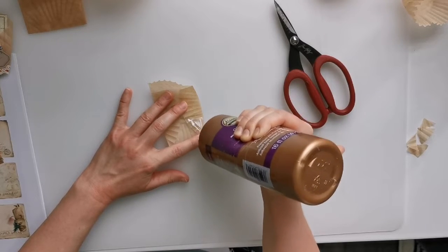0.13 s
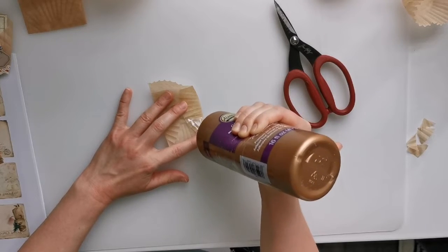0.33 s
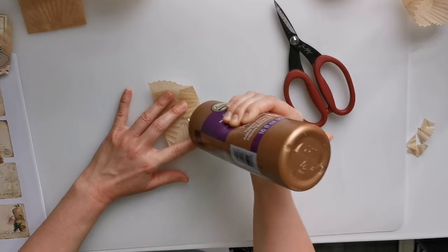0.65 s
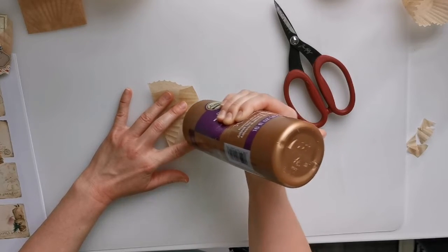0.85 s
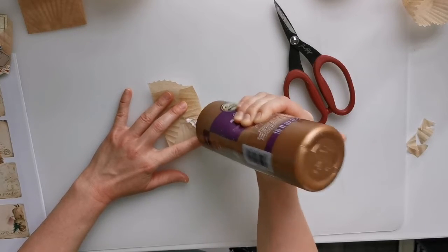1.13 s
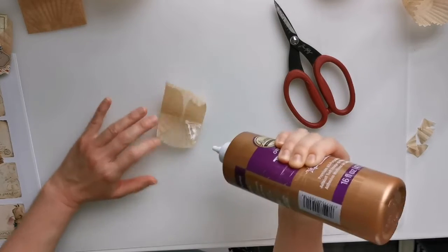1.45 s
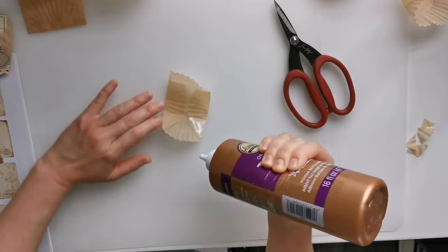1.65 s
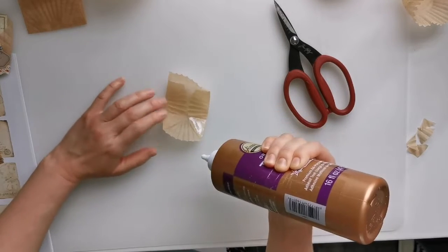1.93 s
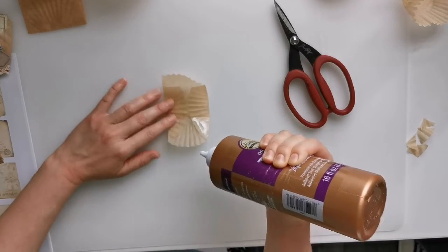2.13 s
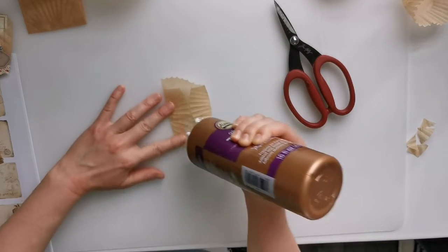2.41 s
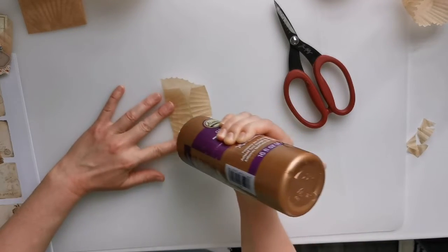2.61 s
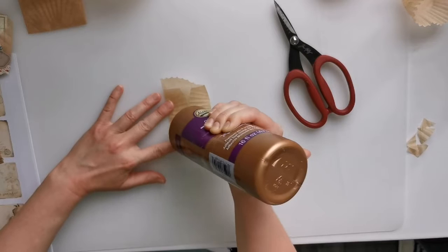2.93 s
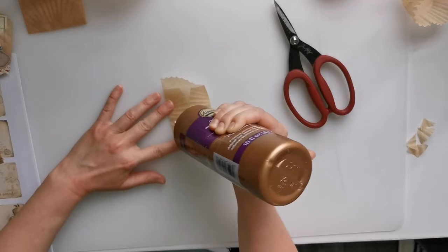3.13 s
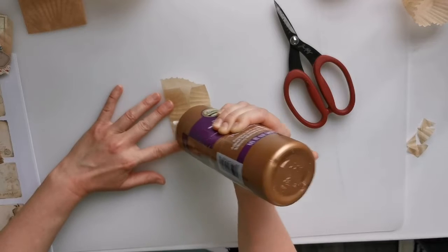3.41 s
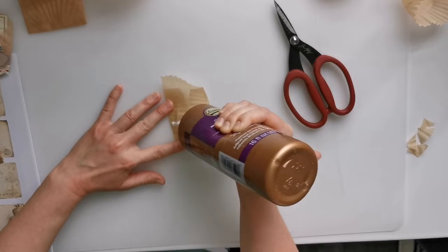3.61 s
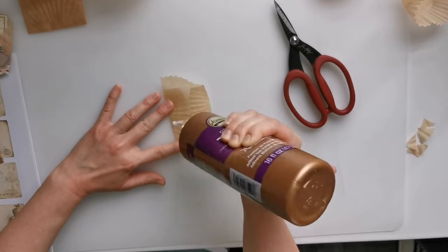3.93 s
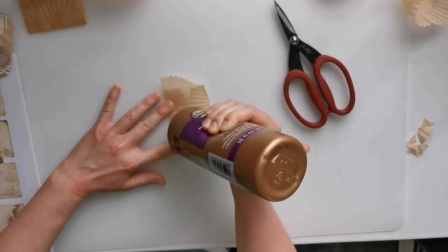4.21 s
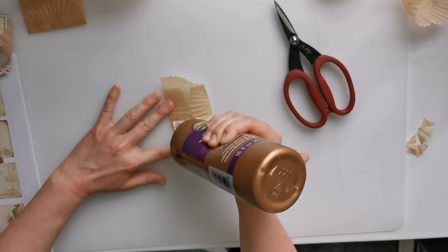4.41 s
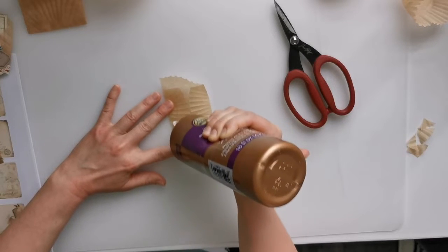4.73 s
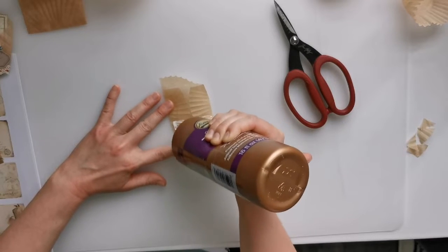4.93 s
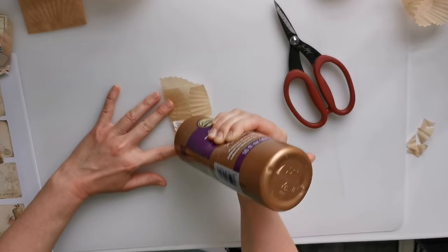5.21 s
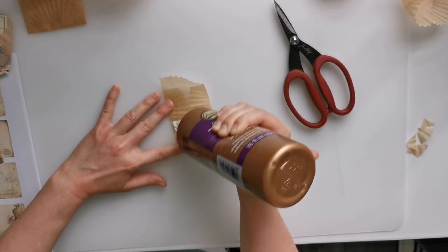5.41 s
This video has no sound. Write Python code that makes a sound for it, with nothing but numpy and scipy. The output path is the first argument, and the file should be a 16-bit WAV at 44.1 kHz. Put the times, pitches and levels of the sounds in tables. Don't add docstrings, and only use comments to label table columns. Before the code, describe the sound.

Thin crisp paper buckles in tiny bright snaps, some with a brief papery thump or crunch. Bursts are irregular with near-silent gaps; the strongest run comes just past the middle, and a lighter one closes. Faint hollow plastic ticks from the bottle are barely noticeable. Close stereo pickup indoors, with table and wall reflections, distant appliance rumble and soft microphone hiss.

```python
import sys
import numpy as np
from scipy import signal
from scipy.fft import irfft
from scipy.io import wavfile
from scipy.ndimage import uniform_filter1d

SR = 44100
rng = np.random.default_rng(int(sys.argv[2]) if len(sys.argv) > 2 else 0)


def bounce(signal):
    frames = np.transpose(np.atleast_2d(signal))
    limited = np.clip(frames, -1, 1)
    pcm = np.round(limited * 32767).astype(np.int16)
    wavfile.write(sys.argv[1], SR, pcm)


def makeup_ratio(level_db):
    decades = np.asarray(level_db, float) / 20
    return 10 ** decades


N = 245195

# pitch_hz, level_db, t60_s
SHEET_MODES = [(3050, -10, .0018), (4750, -3, .0022), (5800, -4, .0016), (7050, 0, .0022),
               (8800, -2, .0018), (10600, -4, .0015), (12200, -5, .0015), (13900, -8, .0014),
               (15500, -10, .0014)]
# pitch_hz, level_db, t60_s
CUP_MODES = [(890, 3, 0.0041), (1310, 0.5, 0.0044), (2290, 14, 0.0015)]


def evened(x):
    return x / np.sqrt(np.mean(x ** 2) + 1e-20)


def read(points, hz):
    f, value = np.transpose(points)
    return np.interp(np.log(hz + 1), np.log(f + 1), value)


def add(mix, start_s, sound):
    part = mix[:, max(round(start_s * SR), 0):][:, :sound.shape[1]]
    part += sound[:, :part.shape[1]]


def ring(modes, bright_db, luck, spread_db, detune=.045, rise_s=.0002):
    hz, db, t60 = np.transpose(modes)[:, :, None]
    k = len(modes)
    t = np.arange(400) / SR
    hz = hz * (1 + detune * luck[:k, None])
    db = db + bright_db * np.log2(hz / 7000) * 0.33
    own = luck[k:3 * k].reshape(2, k, 1)
    shared = luck[3 * k:4 * k, None]
    level = makeup_ratio(db + spread_db * (shared + .9 * own) - 60 * t / t60)
    phase = np.pi * np.arange(k)[:, None] + 0.67 * own * np.sqrt(hz / 7000) + 0.5 * shared
    onset = 1 - np.exp(-(t / rise_s) ** 2)
    sound = (level * np.sin(2 * np.pi * hz * t + phase)).sum(1) * onset
    return sound / abs(sound).max(1, keepdims=True)


def shatter(sound, luck, share=0.035, db=-10.0, t60_s=0.022):
    t = np.arange(len(luck)) / SR
    slips = np.sign(luck) * (abs(luck) < share) * makeup_ratio(db - 60 * t / t60_s) * (t > .0004)
    return signal.fftconvolve(sound, slips[None], axes=1)


def snaps():
    # start_s, peak_db, brightness_db, pitch_hz, second_pitch_hz
    dabbing = [(0.0168, -35, 1, 9300, 13600), (0.1481, -45, 10, 9170, 11600), (0.182, -48, 10, 9260, 5300),
               (0.2045, -40, 11, 6850, 10900), (0.2147, -34.5, 21, 13100, 9600),
               (0.2175, -44, 20, 13600, 12000), (0.3185, -60, -3, 2710, 5040),
               (0.6972, -56, -2, 4550, 7320), (0.7004, -58, 15, 12190, 9860),
               (0.8081, -40.5, 7, 6700, 9500), (0.8176, -44, 13, 9800, 6900), (0.8854, -29, 7, 6500, 8200),
               (0.9151, -30, 20, 7230, 9600), (1.0425, -38.5, 10, 6600, 9050),
               (1.1129, -44, 22, 9550, 6700), (1.1319, -57, 3, 12200, 4610)]
    # start_s, peak_db, brightness_db, pitch_hz, second_pitch_hz
    lifting = [(1.356, -34, -3, 12500, 9040), (1.3861, -32.5, 1, 5130, 12490),
               (1.3882, -34, 9, 12620, 8740), (1.3914, -28.5, 10, 12900, 10100),
               (1.4175, -46, 1, 7580, 4690), (1.42, -28.5, -4, 4740, 6720),
               (1.4252, -19.5, -0.5, 6760, 12300), (1.4266, -24, 10, 7110, 9800),
               (1.484, -46, -9, 3190, 5120), (1.7122, -53, -7, 4910, 6890), (1.7144, -60, -16, 4950, 6850),
               (1.7237, -53, 5, 9090, 2630), (1.726, -60, 9, 9090, 7600), (1.768, -60, 4, 9560, 5300),
               (1.7801, -50, -14.5, 5550, 7580), (1.7826, -48, 0.5, 6680, 5130),
               (2.2116, -40, 2, 8910, 6930), (2.2256, -30.5, 13, 5870, 9470), (2.252, -40, -14, 4610, 3100),
               (2.2643, -33.5, -32, 4900, 7000), (2.3187, -37, -2, 7000, 3360),
               (2.3219, -30.5, 3, 4850, 7700), (2.3498, -36.5, -20, 6860, 3550),
               (2.3643, -48, 2, 4570, 7670), (2.3666, -43.5, -11, 4330, 7500), (2.3694, -44, 3, 5900, 9500),
               (2.4514, -55, 1, 6550, 4950), (2.5012, -49, 3, 5600, 7900)]
    # start_s, peak_db, brightness_db, pitch_hz, second_pitch_hz
    pressing = [(3.056, -53, -6, 5120, 7500), (3.0666, -35, -2.5, 5930, 10000),
                (3.1382, -36.5, -11, 5800, 9400), (3.1872, -26, -8, 6800, 5120),
                (3.2469, -22.5, 7, 6700, 8570), (3.279, -32, 15, 7100, 9100),
                (3.3064, -30, -14, 6760, 5400), (3.3233, -30, -15, 6930, 5160),
                (3.36, -32.5, 5, 5240, 9000), (3.3903, -41, 1, 7200, 4850), (3.417, -35.5, 4, 7250, 10470),
                (3.4189, -29, 12, 7140, 5530), (3.4552, -40.5, -24, 2650, 7320),
                (3.5374, -23, 29, 9450, 7740), (3.5812, -27, 12, 7070, 4930), (3.6054, -40, -4, 5510, 9170),
                (3.6087, -19.5, 11, 6830, 8470), (3.6228, -41, 0, 7240, 5040),
                (3.6651, -29, -9, 9200, 6500), (3.672, -35, 8, 7000, 5340), (3.6759, -27.5, -6, 4700, 7150)]
    # start_s, peak_db, brightness_db, pitch_hz, second_pitch_hz
    dragging = [(3.7202, -30.5, 15, 11020, 6630), (3.7233, -24, -3, 6980, 11000),
                (3.7587, -26, -4, 9600, 13200), (3.7754, -24, -30, 5030, 6600),
                (3.8083, -36, -27, 4800, 7200), (3.8243, -20.5, -9, 4430, 11700),
                (3.8262, -19, -12, 7100, 2900), (3.8417, -27.5, -17, 6330, 10800),
                (3.8549, -16.5, -1, 7430, 8750), (3.9036, -29, -4, 7040, 5100),
                (3.929, -41, 2, 4520, 10470), (3.932, -31, 3, 4260, 8900), (3.968, -33, 5, 6170, 12200),
                (3.9799, -20, -6, 11000, 6300), (4.0267, -21.5, 3, 5360, 7900),
                (4.0545, -35, 22, 10900, 4540), (4.1703, -35.5, 11, 6120, 7500)]
    # start_s, peak_db, brightness_db, pitch_hz, second_pitch_hz
    finishing = [(4.4078, -64, -19, 5200, 3360), (4.5055, -57, -7, 6800, 5210),
                 (4.569, -45.5, -25, 5600, 9660), (4.592, -56, 0, 5470, 9860),
                 (4.6252, -52.5, 20, 11500, 7800), (4.6785, -23, 16, 5270, 9500),
                 (4.716, -34, 11, 5100, 10000), (4.7184, -37.5, 10, 8650, 4870),
                 (4.925, -59, -9, 2900, 6030), (4.9742, -48.5, -1, 6540, 9730),
                 (4.9775, -48, 8, 10510, 6050), (4.9814, -50.5, 13, 12500, 9200),
                 (5.09, -44, 8, 11330, 7920), (5.0923, -45.5, 2, 7280, 11330), (5.115, -55, 4, 6030, 12620),
                 (5.1177, -38, -6, 6600, 8700), (5.1231, -31.5, 8, 8500, 12600),
                 (5.13, -38, 12, 9170, 6850), (5.1345, -32, 8, 8600, 6590), (5.1372, -35, 14, 8530, 6850),
                 (5.1536, -25, 11, 6070, 10300), (5.1797, -31, 1, 4830, 8270),
                 (5.2478, -18.5, 8, 6900, 10440), (5.324, -33, 0, 6850, 9000),
                 (5.3326, -17.5, 17, 11710, 7040), (5.386, -36.5, 6, 10000, 7110),
                 (5.3998, -27.5, 21, 12900, 10200)]
    # start_s, peak_db, brightness_db, pitch_hz,
    # second_pitch_hz
    further_snaps = [(.2514, -52, 10, 12660, 9000), (0.893, -46, 3, 7040, 5060), (0.9233, -42, 8, 7100, 9600),
                     (1.3814, -37, -2, 5050, 3500), (1.3992, -31, 1, 10700, 5750),
                     (1.4332, -29, 2, 7000, 10500), (1.437, -43, 4, 8500, 5000), (2.2024, -58, 0, 7190, 5000),
                     (2.209, -47, -4, 5480, 9000), (3.2148, -38.5, 8, 6980, 12000),
                     (3.2575, -32.5, -4, 8800, 5200), (3.337, -38.5, 8, 6500, 12500),
                     (3.617, -40, 8, 8600, 6000), (3.6255, -37, 0, 4550, 8000), (3.638, -45, 6, 9000, 5000),
                     (3.651, -44, -12, 4520, 3000), (3.7333, -38.5, 0, 9500, 5000),
                     (3.736, -40, 0, 7540, 4500), (3.7715, -34, -14, 9750, 5130), (3.877, -32, 1, 5100, 8550),
                     (4.4315, -59, 0, 4740, 12100), (5.256, -31, 12, 5400, 8900), (5.338, -31, 8, 6940, 11000),
                     (5.3597, -33, 6, 6800, 10000), (5.3759, -42, 3, 6980, 11000)]
    rows = dabbing + lifting + pressing + dragging + finishing + further_snaps
    spread, beamed = np.zeros((2, 2, N))
    luck = rng.standard_normal((len(rows), 4, 4 * len(SHEET_MODES)))
    slip_luck = rng.uniform(-0.92, 1, (len(rows), 500))
    for row, (crack_luck, flap_luck, crease_luck, pan_luck), after in zip(rows, luck, slip_luck):
        start_s, db, bright_db, hz, second_hz = row
        flap_db = -20.5 - 0.27 * (db + 34.5)
        pan_db = -1 - .6 * start_s + 1.5 * pan_luck[1]
        crack = ring(SHEET_MODES, bright_db, crack_luck, spread_db=1.2)
        own_modes = [(hz, 0, .0035), (second_hz, -2.5, .003)]
        crease = ring(own_modes, 0, crease_luck, spread_db=0, detune=0)
        flap = makeup_ratio(flap_db) * ring(CUP_MODES, 0, flap_luck, spread_db=2.0, detune=.12)
        gain = makeup_ratio(db + 2.5 + np.array([[pan_db], [-pan_db]]) / 2)
        onset_s = start_s - .0004
        add(spread, onset_s, gain * (.7 * crack + flap + .3 * crease))
        add(beamed, onset_s, gain * shatter(0.84 * crack + 0.34 * flap + 0.48 * crease, after))
        add(beamed, onset_s, gain * makeup_ratio(-5.5) * crease)
    return spread, beamed


def thumps():
    # start_s, peak_db, pitch_factor
    pushes = [(0.884, -53, 1.2), (1.39, -33, 1.63), (1.424, -33, 1.25), (1.482, -40, 1.9),
              (2.224, -42, 1.1), (2.263, -44, 0.95), (3.185, -38.5, 1.9), (3.245, -34.5, 0.83),
              (3.305, -41, 1.1), (3.453, -49, 1.17), (3.535, -36, 1.15), (3.58, -44, 1.03),
              (3.607, -37, 0.99), (3.663, -42, 1.16), (3.722, -36, 1.16), (3.757, -43, 0.98),
              (3.773, -36.5, 1.53), (3.822, -37, 0.87), (3.854, -44, 1.8), (3.961, -51, 0.6),
              (3.978, -54, 0.87), (4.026, -38, 1.2), (4.677, -57, 1.1), (5.246, -56, 1.1),
              (5.331, -51, 0.67), (5.398, -39, 1.3)]
    out = np.zeros((2, N))
    for start_s, db, factor in pushes:
        modes = [(hz * factor, level_db, t60) for hz, level_db, t60 in CUP_MODES]
        luck = rng.standard_normal(4 * len(modes))
        gain = makeup_ratio(db - 5.5 + np.array([[-1.5], [1.5]]))
        add(out, start_s, gain * ring(modes, 0, luck, spread_db=1.0, detune=0.025))
    return out


def creases(modes, per_s, uneven_db, clump_db, kinds=range(14)):
    size = makeup_ratio(uneven_db * np.minimum(rng.exponential(1, N), 4)) * (rng.random(N) < per_s / SR)
    kind = rng.integers(0, len(kinds), N)
    out = np.zeros((2, N))
    for k in kinds:
        grain = ring(modes, 0, rng.standard_normal(4 * len(modes)), spread_db=4.5, detune=0.067)
        out += signal.oaconvolve((size * (kind == k))[None], grain, axes=1)[:, :N]
    knots = np.arange(0, N, 200)
    clumps = np.interp(np.arange(N), knots, rng.standard_normal(len(knots)))
    return evened(out * makeup_ratio(clump_db * clumps))


def rustle():
    # time_s, level_db
    pressure = [(0.0, -59), (0.11, -90), (0.76, -72), (1.41, -74), (1.59, -84.5), (2.23, -85), (2.38, -84),
                (2.52, -71), (2.66, -90), (3.11, -79), (3.62, -61), (3.83, -45), (4.03, -54), (4.21, -90),
                (4.68, -64.5), (5.2, -78), (5.3, -61), (5.56, -67)]
    # start_s, length_s, level_db, dull_flapping_share (0-1)
    crunches = [(0.202, 0.032, -63.5, 0.07), (0.917, 0.014, -71, 0.3), (1.3805, 0.013, -46, 0.12),
                (1.4225, 0.008, -37, .1), (1.43, .012, -44, 0.08), (1.44, 0.09, -58, 0.9),
                (1.709, 0.052, -64, 0), (1.762, 0.046, -57.5, 0.34), (1.85, 0.053, -81, 0.4),
                (2.172, .022, -70, .2), (2.192, 0.032, -52, 0.2), (2.228, .03, -56, .3),
                (2.375, .065, -62, .1), (2.26, 0.011, -44.5, 0.51), (2.301, 0.17, -62, 0.2),
                (2.327, 0.048, -61, 0.3), (2.454, 0.09, -68, 0.06), (3.14, 0.052, -79, .1),
                (5.11, .07, -71, 0.1), (2.58, 0.13, -82, 0), (3.28, 0.07, -65, 0.2),
                (3.614, 0.015, -42.5, 0.14), (3.719, 0.021, -40, 0.05), (3.82, 0.018, -43, 0.36),
                (3.86, 0.0092, -52, 0.3), (3.974, 0.02, -47.5, 0.27), (4.425, 0.1, -86, 0.1),
                (4.68, 0.1, -66, 0.02), (5.101, 0.087, -53, 0.33), (5.33, 0.067, -52.5, 0.03)]
    t = np.arange(N) / SR
    crisp = makeup_ratio(np.interp(t, *np.transpose(pressure)) - 11.0)
    dull = np.zeros(N)
    for start_s, length_s, db, dull_share in crunches:
        u = np.clip((t - start_s) / length_s, 0, 1)
        swell = makeup_ratio(db) * np.sin(np.pi * u ** 1.06) ** 1.02
        crisp = crisp + swell
        dull = dull + dull_share * swell
    sheet = creases(SHEET_MODES, 4500, 3.1, 4.4) * crisp
    cup = creases(CUP_MODES + SHEET_MODES[:2], 2500, 0.98, 0.97) * dull
    return (sheet + cup) * makeup_ratio(np.array([[-1.5], [1.5]]))


def bottle():
    # start_s, peak_db, length_s, pitch_hz
    rubs = [
        (1.481, -58, .008, 1900),
        (1.722, -72, .032, 1700),
        (1.780, -63, .008, 1690),
        (1.7905, -62, .008, 1690),
        (2.19, -69, .03, 1600),
        (3.453, -54, .005, 2200),
        (3.454, -58, .004, 2550),
        (3.457, -65, .02, 2080),
        (3.48, -70, .018, 2130),
    ]
    out = np.zeros((2, N))
    for start_s, db, length_s, hz in rubs:
        t = np.arange(min(round(length_s * SR), 2000)) / SR
        wobble = np.cumsum(.11 * rng.standard_normal(len(t)))
        rub = np.sin(2 * np.pi * hz * t + wobble) * np.sin(np.pi * (t / length_s) ** 1.4)
        add(out, start_s, makeup_ratio(db + 4.5 + np.array([[-1.], [1.]])) * rub)
    return out


def room(x):
    # delay_s, spread_s, level_db
    echoes = [(.0009, .0003, -11), (.0018, .0005, -17), (.0031, .0006, -10.5), (.0046, .0006, -21),
              (.0081, .0008, -10), (.0115, .0013, -10), (.016, .002, -23), (.027, .002, -21)]
    # frequency_hz, t60_s
    wall_decay = [(800, 0.16), (3000, 0.5), (7000, 0.38), (12000, 0.42), (16000, 0.22)]
    t = np.arange(SR // 2) / SR
    signs = rng.choice([-1., 1.], (2, 2, len(t)))
    taps = signs * (rng.random((2, 2, len(t))) < .2)
    build_up = np.clip((t - .006) / 0.0052, 0, 1)
    hz, frame_s, z = signal.stft(taps[0] * build_up, SR, nperseg=256)
    decay = makeup_ratio(-60 * frame_s / read(wall_decay, hz)[:, None])
    walls = signal.istft(z * decay, SR, nperseg=256)[1][:, :len(t)]
    path = makeup_ratio(-10.5) * walls / np.linalg.norm(walls[0])
    for delay_s, spread_s, db in echoes:
        bunch = taps[1] * np.exp(-((t - delay_s) / spread_s) ** 2)
        bunch = signal.lfilter([1, -.4], 1, bunch)
        path += makeup_ratio(db) * bunch / np.linalg.norm(bunch, axis=1, keepdims=True)
    path[:, 0] = 1
    return signal.fftconvolve(x, path, axes=1)[:, :N]


def ports(x):
    # frequency_hz, difference_db
    port_lean = [(300, -1), (1000, -4), (4000, 0.6), (8000, -0.2), (12500, -8), (16000, -4)]
    lean_db = read(port_lean, np.fft.rfftfreq(256, 1 / SR)) / 2
    taps = irfft(makeup_ratio(np.array([lean_db, -lean_db])))
    taps = np.roll(taps, 128, 1) * np.hanning(257)[:-1]
    return signal.oaconvolve(x, taps, axes=1)[:, 128:N + 128]


def swells():
    # start_s, level_db, length_s, pitch_hz
    pushes = [
        (0.946, -60, 0.12, 60),
        (2.68, -50, 0.11, 101.6),
        (3.045, -52, 0.078, 143),
        (3.06, -49, 0.054, 38.3),
        (3.286, -49, 0.055, 105),
        (3.472, -47.5, 0.11, 115),
        (3.897, -61, 0.1, 70.5),
        (4.121, -48, 0.073, 89.6),
        (4.415, -48.5, 0.1, 59),
        (5.38, -52.5, 0.083, 114),
    ]
    out = np.zeros((2, N))
    for start_s, db, length_s, hz in pushes:
        t = np.arange(0, length_s, 1 / SR)
        push = np.sin(np.pi * t / length_s) * np.sin(2 * np.pi * hz * t)
        add(out, start_s, makeup_ratio(db) * push * np.ones((2, 1)))
    return out


def drift(per_s):
    t = np.arange(N) / SR
    return evened(np.interp(t, np.arange(200) / per_s, rng.standard_normal(200)))


def hum():
    # pitch_hz, rms_db
    motor_lines = [(30.4, -59.5), (59.2, -65), (91.5, -71), (183.0, -65), (274.5, -66), (306.8, -68),
                   (393.0, -78)]
    out = np.zeros(N)
    for hz, db in motor_lines:
        turns = np.cumsum(hz + 2.225 * drift(9)) / SR
        out += np.sqrt(2) * makeup_ratio(db + 3.2 * drift(7)) * np.sin(2 * np.pi * turns)
    return out * makeup_ratio(np.array([[.8], [-.8]]))


def steady_noise(spectrum, db, patchy_db):
    # frequency_hz, coherence (-1 to 1)
    likeness = [(60, 1), (180, 0.83), (550, 0.57), (1650, -0.27), (4970, 0.11), (15000, -0.16)]
    # frequency_hz, difference_db
    noise_lean = [(60, -2), (180, 6), (550, -4.5), (1650, -3.5), (4970, -1), (15000, -8.5)]
    frames, hz = N // 512 + 5, np.fft.rfftfreq(2048, 1 / SR)
    a, b, c, d, patches = rng.standard_normal((frames, 1025, 5)).T
    patches = uniform_filter1d(patches, size=6, axis=0)
    patches = evened(uniform_filter1d(patches, size=8, axis=1))
    same = np.clip(read(likeness, hz), -1, 1)[:, None]
    left = a + 1j * b
    right = same * left + np.sqrt(1 - same ** 2) * (c + 1j * d)
    z = np.array([left, right])
    lean_db = read(noise_lean, hz)[:, None] / 2
    z *= makeup_ratio(read(spectrum, hz)[:, None] + patchy_db * patches + np.array([lean_db, -lean_db]))
    return makeup_ratio(db) * evened(signal.istft(z, nperseg=2048, noverlap=1536)[1][:, :N])


def house():
    # frequency_hz, density_db (per Hz)
    rumble = [(12, -58), (24, -15.5), (96, 1.5), (152, -8), (188, -32.5), (209, -10), (273, -10),
              (332, -18.5), (457, -13.5), (556, -19), (712, -18), (981, -26), (1400, -32), (1820, -43),
              (3080, -120)]
    # time_s, level_db
    load = [(0.0, -54.5), (0.46, -55), (0.94, -54.5), (1.53, -56.5), (1.86, -55.5), (3.39, -55),
            (3.78, -57), (4.15, -56), (4.75, -57), (5.03, -56), (5.19, -56.5), (5.39, -59.5), (5.56, -55)]
    load_db = np.interp(np.arange(N) / SR, *np.transpose(load))
    steady = steady_noise(rumble, db=-54.5, patchy_db=1.08) + hum()
    return steady * makeup_ratio(0.94 * (load_db - load_db.mean()))


def hiss():
    # frequency_hz, density_db (per Hz)
    hiss_spectrum = [(820, -36), (1400, -10), (1470, -2.5), (1990, 3.5), (3010, -4), (4360, -9.5),
                     (5580, -12.5), (9850, -19), (10900, -14.5), (16500, -25)]
    return steady_noise(hiss_spectrum, db=-73.0, patchy_db=0.97)


def scene():
    spread, beamed = snaps()
    in_room = room(spread + thumps() + rustle() + bottle())
    near = ports(in_room + beamed)
    return near + swells() + house() + hiss()


def top_cut(x):
    return signal.sosfilt(signal.butter(12, 16970, fs=SR, output="sos"), x)


def record(dry):
    edge = signal.firwin(601, 15850, window=("kaiser", 6), fs=SR)
    top = signal.firwin(601, 16800, fs=SR)
    low = signal.oaconvolve(dry, edge[None], "same")
    wide = signal.oaconvolve(dry, top[None], "same")
    mix = low + makeup_ratio(-23) * (wide - low)
    return top_cut(mix)


dry = scene()
out = record(dry)
bounce(out)
```